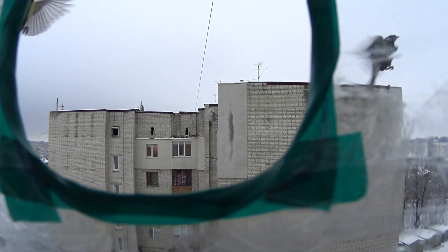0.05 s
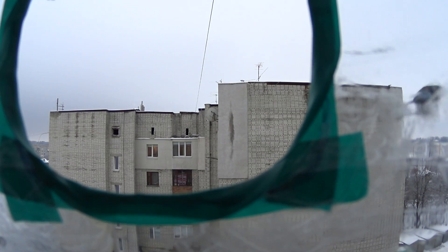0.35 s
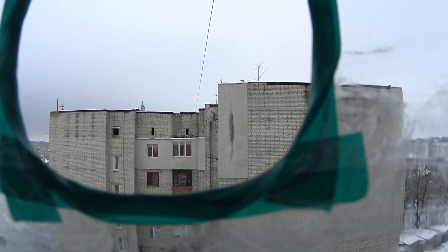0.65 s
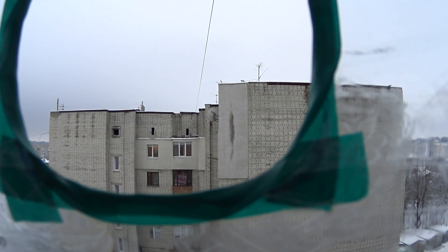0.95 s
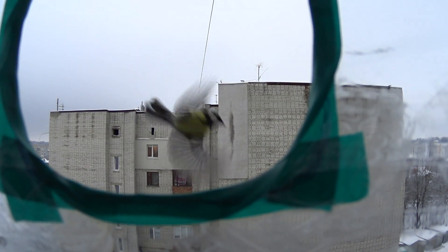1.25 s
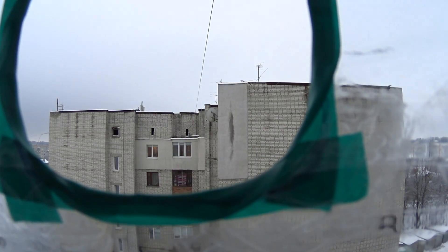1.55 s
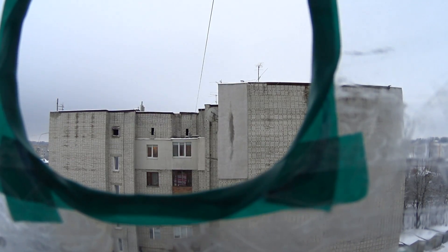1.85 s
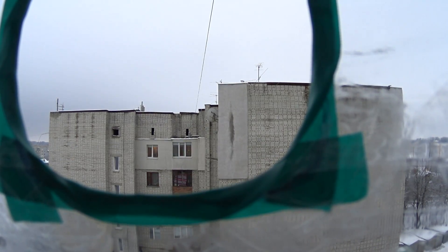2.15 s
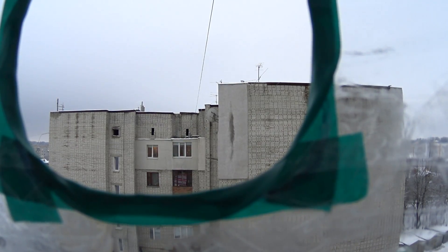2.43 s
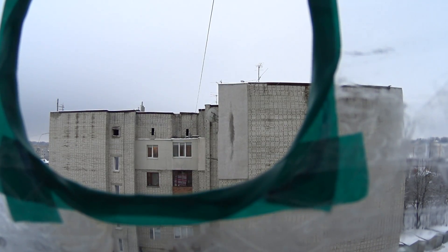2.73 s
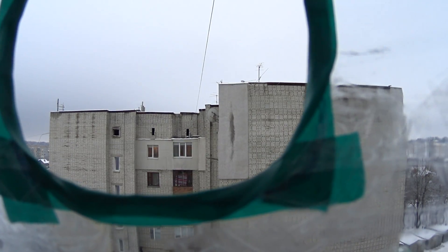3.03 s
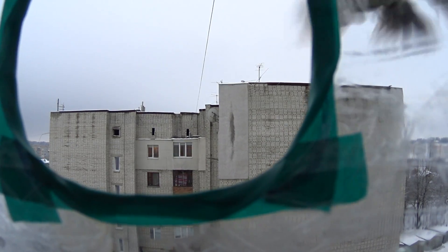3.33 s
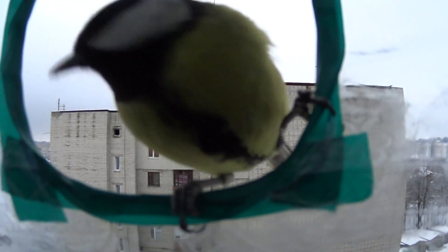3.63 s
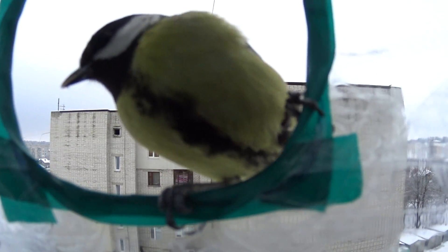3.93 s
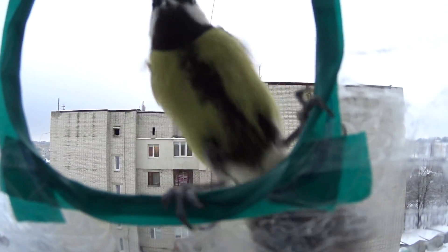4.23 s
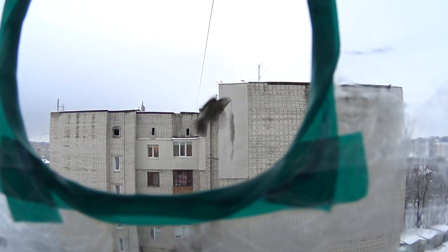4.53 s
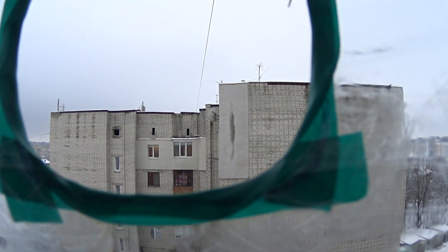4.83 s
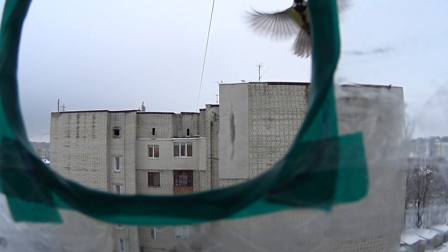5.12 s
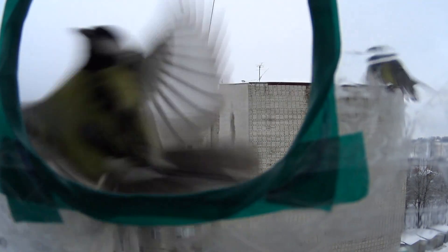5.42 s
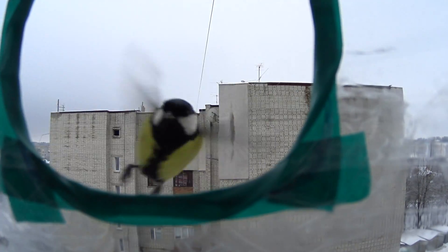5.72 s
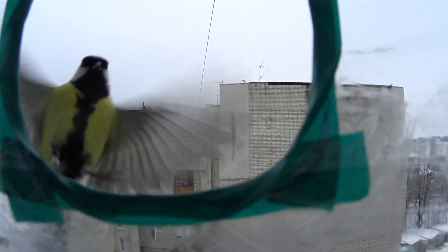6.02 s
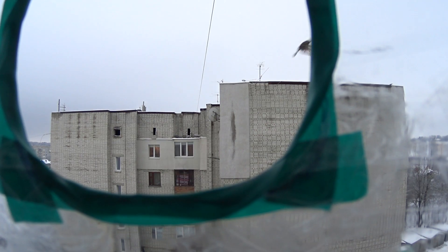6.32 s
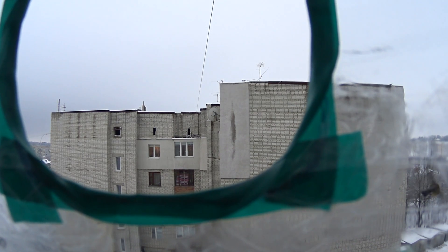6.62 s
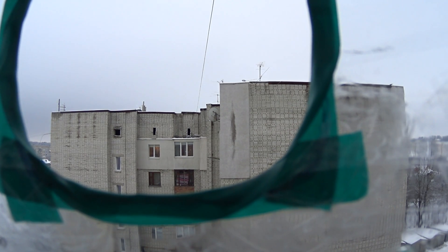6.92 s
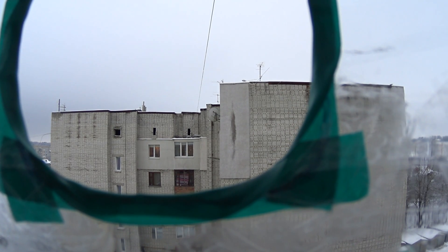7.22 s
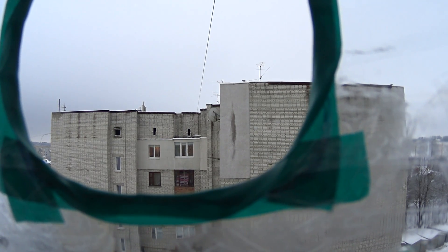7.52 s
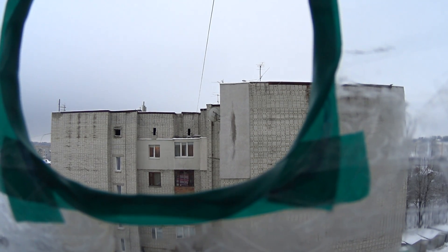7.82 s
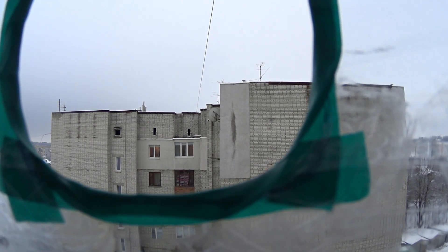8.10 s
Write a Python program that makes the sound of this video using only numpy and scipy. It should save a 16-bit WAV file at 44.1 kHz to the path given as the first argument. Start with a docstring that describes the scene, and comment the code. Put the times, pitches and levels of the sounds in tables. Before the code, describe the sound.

Small birds visit a plastic bottle feeder outside a high window, heard from inside the bottle. A few thin, high chirps and fluttering passes come first, then dull hollow knocks. A bird lands with sharp claw taps and scratching, then takes off, its wings buffeting the microphone. Another loud flutter brings more clicks and a skid before the wings fade. Distant traffic hums low throughout.

```python
"""Tits land on the taped rim of a plastic bottle feeder, heard from a microphone inside the bottle.
Their claws tap, skid and shuffle, ringing the thin shell; bumps on the mount knock in its hollow.
They call and flutter past, wings pumping the air, and one take-off blows straight into the microphone.
The feeder is outside a window, high above a winter town; far traffic hums in the valley below."""
import sys
import numpy as np
from scipy import signal
from scipy.fft import rfft, irfft, next_fast_len
from scipy.io import wavfile
from scipy.ndimage import uniform_filter1d

SR = 44100
rng = np.random.default_rng(int(sys.argv[2]) if len(sys.argv) > 2 else 0)


def digitize_waveform(pressure):
    """Quantize a signal to 16-bit integers and store it at the path in sys.argv[1].

    Rows of a 2-D input are taken as channels; values are limited to [-1, 1].
    """
    field = np.atleast_2d(pressure).T
    bounded = np.clip(field, -1, 1)
    quanta = np.round(bounded * 32767).astype(np.int16)
    wavfile.write(sys.argv[1], SR, quanta)


N = 368676
TIME = np.arange(N) / SR

# claw taps on the rim, right by the microphone; body and tick are relative to the middle band, the clack:
# (time [s], clack [dB], body [dB], tick [dB], pitch of the dent [Hz])
CLAW_TAPS = [(3.4535, -30, 16.5, -17, 2030), (3.5352, -42, 7.5, -24, 2000), (3.547, -43.5, 10, -12, 1696),
             (3.579, -40.5, 2, -21, 2230), (3.6848, -36.5, -10, -12.5, 3520), (3.707, -42.5, 9, -19, 1890),
             (3.713, -41.5, 1, -11, 1970), (3.78, -49, 7, -21, 1800), (3.7958, -42, 0.5, -37, 1710),
             (3.8753, -54, 16.5, -21, 1970), (3.9327, -45, 5, -10.5, 2570), (3.9653, -36.5, -13, -32, 2120),
             (3.983, -45, -5, -31, 2100), (3.998, -43, -9, -36, 2110), (4.02, -40, -3, -29, 1820),
             (4.1528, -37, -14, -13.5, 3520), (4.1694, -36, -9, -32, 1865), (4.218, -48, 0, -18, 2000),
             (4.2324, -36, -3, -19, 2100), (4.237, -35.5, -4, -30, 1800), (4.2459, -33, 5, -13, 1800),
             (4.3019, -27, 10.5, -7, 2320), (4.317, -37, -6, -7, 2800), (5.4802, -30, 3, -6, 2430),
             (5.8507, -18.5, -2, -12, 2380), (5.8555, -33, 2, -1, 3300), (5.87, -30, -14, -14.5, 3380),
             (5.8795, -22, -8, -0.5, 3660), (5.9216, -29.5, 7.5, -8.5, 2550), (6.244, -51, 14, -6, 2750),
             (6.584, -51.5, 9.5, -11.5, 2250), (6.92, -61.5, 17.5, -10, 2630)]


def claws(body_hz=1550, tick_hz=5500, contact_hz=8500, skid_s=.0012, skid_sharpness=1.15):
    """A claw hits, dents the wall and skids; a heavy grip rings the shell, a light step snaps drily."""
    size, lead, attack = 4096, 32, 296   # samples
    out, t = np.zeros((2, N)), TIME[:size - lead]
    hz = np.arange(size // 2 + 1) * SR / size
    # three overlapping bands that add up to the whole tap
    body = 1 / (1 + (hz / body_hz) ** 6)
    tick = 1 - 1 / (1 + (hz / tick_hz) ** 8)
    clack = 1 - body - tick
    contacts = [(*tap, 1) for tap in [*CLAW_TAPS, *rebounds(CLAW_TAPS), *shuffles()]]
    contacts += [(*slip, skid_sharpness) for slip in skids()]
    for s, db, body_db, tick_db, dent_hz, sharpness in contacts:
        weight = from_db((db + 30) / 4)
        force = from_db(-14) * weight * rng.standard_normal(len(t)) * np.exp(-t / (skid_s * weight))
        force[0] += 1   # the hit ahead of the crunch
        # a blunt toe presses longer than a claw tip, so it sounds duller
        top_hz = min(sharpness * contact_hz * from_db(tick_db / 3), 14000)
        force = butter(force, top_hz, "low", order=3)
        wall = weight * shell(force, spread=.5, crack=14 / weight ** 2)
        dent = 5.1 * ring(force, dent_hz, t60=.0032)
        tap = butter(wall + dent, 170, "high")
        spectrum = rfft(np.pad(tap, ((0, 0), (lead, 0))))
        for part, part_db in [(body, body_db - 2), (clack, 0), (tick, tick_db)]:
            band = irfft(spectrum * part)
            attack_rms = band.mean(axis=0)[:attack].std()
            add(out, s - lead / SR, band * from_db(db + part_db) / attack_rms)
    return out * from_db([[-.6], [.6]])   # slightly to the right


def rebounds(taps, above_db=-33, delay_s=.0055, loss_db=12.5, body_db=2):
    """A hard tap touches the rim again, more softly."""
    for s, db, _, tick_db, dent_hz in taps:
        if db > above_db:
            yield s + delay_s, db - loss_db, body_db, tick_db, dent_hz


# restless feet on the rim: (start [s], end [s], clack [dB])
FOOT_SHUFFLES = [(3.515, 3.58, -43), (3.693, 3.72, -44), (3.89, 3.92, -56.5), (4.153, 4.2, -51),
                 (5.913, 5.985, -49)]


def shuffles(step_s=.015, scatter_db=5, body_db=2, tick_db=-25.5, dent_hz=1990):
    """Light, uneven steps run together into a faint scratching."""
    for start, end, db in FOOT_SHUFFLES:
        for s in np.arange(start, end, step_s):
            jitter_s = step_s * (rng.random() - .5)
            yield s + jitter_s, db + scatter_db * rng.standard_normal(), body_db, tick_db, dent_hz


# a foot skidding over the rim, with its levels at mid-run:
# (start [s], slips [count], clack [dB], relative body [dB], relative tick [dB], pitch of the dent [Hz])
FOOT_SKIDS = [(3.4522, 6, -24.5, 4.5, -6.5, 2030), (6.029, 4, -18, -3.5, -20, 2850)]


def skids(slip_s=.0106, ends_db=-2.5, catch_s=.005, catch_db=-10.5):
    """Stick and slip: the run swells and fades, brightening as the load moves from toe to claw tip."""
    for start, slips, db, body_db, tick_db, dent_hz in FOOT_SKIDS:
        middle = (round(slips) - 1) / 2
        for k in range(round(slips)):
            s, past_middle = start + k * slip_s, k - middle
            slip_db = db + ends_db * (past_middle / middle) ** 2
            tone = body_db - 1.5 * past_middle, tick_db + 2.2 * past_middle, dent_hz
            yield s, slip_db, *tone
            # a rough skid catches once more within each slip
            yield s + catch_s * (.5 + rng.random()), slip_db + catch_db, *tone


# modes of the plastic wall around the microphone: (frequency [Hz], level [dB], time to fall 60 dB [s])
SHELL_MODES = [(414, 0, 0.031), (576, 3, 0.014), (1054, 8.5, 0.028), (1142, 1, 0.032), (1376, 2.5, 0.022),
               (1567, -8.5, 0.02), (1795, 2.5, 0.0096), (2360, -7.5, 0.005), (2693, 0, 0.009),
               (2885, -5, 0.027), (3550, -1, .022), (4220, 0.5, 0.01), (4940, -4.5, 0.0069),
               (5595, -2.5, 0.0087), (8280, -12, .004), (9900, -1.5, .004)]


def shell(force, spread, crack, wander=.072, floppy_hz=7000, scatter_db=1.5):
    """The place of contact picks each mode's strength and sign; the crowded high modes vary in pitch."""
    out = crack * stereo(force, .15 * np.roll(force, 1))
    for hz, db, t60 in SHELL_MODES:
        pitch = hz * np.exp(wander * min(hz / floppy_hz, 1) ** 2 * rng.standard_normal())
        strength = from_db(db + scatter_db * rng.standard_normal()) * rng.choice([-1, 1])
        mode = strength * ring(force, pitch, t60)
        pan = spread * min(1500 / hz, 1) * rng.choice([-1, 1])
        out = out + stereo(mode, pan * mode)
    return out


# feathers and claws dragging on the outside of the bottle: (start [s], end [s], level [dB])
DRAGS = [(3.453, 3.501, -26), (3.513, 3.601, -44), (4.243, 4.307, -33), (5.425, 5.436, -40),
         (5.93, 5.953, -34.5), (6.02, 6.067, -23.5)]
# their rub, heard from inside: (frequency [Hz], level [dB])
RUB_SPECTRUM = [(120, -5.5), (350, 6.5), (600, 5), (780, -9.5), (1050, 5.5), (1700, -2), (2800, -5.5),
                (4000, -12), (5700, -16), (7000, -19), (10000, -25), (15000, -37.5)]


def scrapes(slips_per_s=2000):
    """Dense little slips along the plastic merge into a rub."""
    slips = (rng.random(N) < slips_per_s / SR) * rng.standard_normal((2, N))
    pressure = sum(from_db(db) * ((TIME > start) & (TIME < end)) for start, end, db in DRAGS)
    mid, side = rms_one(colour(slips, RUB_SPECTRUM))
    return stereo(mid, .26 * side) * uniform_filter1d(pressure, SR // 300)


# dull knocks that reach the microphone through the mount: (time [s], level [dB])
MOUNT_BUMPS = [(0.162, -26), (.949, -25.5), (2.968, -28.5), (3.022, -27.5), (3.04, -26.5), (3.054, -25.5),
               (3.064, -19.5), (3.0704, -15), (3.089, -24.5), (7.016, -29.5), (7.046, -32), (7.082, -30.5)]


def knocks(hollow_hz=570, hollow_t60=.028, wall_hz=3550):
    """Soft bumps ring the hollow of the feeder; the harder ones rattle its wall."""
    out, t = np.zeros((2, N)), TIME[:SR // 6]
    for s, db in MOUNT_BUMPS:
        force = butter(rng.standard_normal(len(t)) * np.exp(-t / .003), 7200, "low")
        wall = shell(force, spread=.3, crack=6.5) + 2 * ring(force, wall_hz, t60=.015)
        pitch = hollow_hz * from_db((db + 29.5) / 20)   # a harder bump rings higher
        hollow = np.sin(2 * np.pi * pitch * t) * from_db(-60 * t / hollow_t60)
        rattle = from_db(-11 + (db + 21.5) / 2) * wall / abs(wall).max()
        add(out, s, from_db(db - 1) * (hollow + rattle))
    return out


# flights close to the microphone, with their levels at the nearest point: (first beat [s], beats [count],
# beat period [s], nearest at [s], passing time [s], pressure [dB], eddies [dB], feather flick [dB])
CLOSE_FLIGHTS = [(0.481, 3, 0.046, .51, .13, -37, -36.5, -66),
                 (1.17, 7, .0415, 1.24, 0.041, -36, -35.5, -46.5),
                 (3.283, 4, 0.047, 3.425, 0.045, -19.5, -31, -57),
                 (4.323, 9, .0468, 4.32, 0.04, -12.5, -28.5, -42.5),
                 (5.442, 7, .0397, 5.47, 0.055, -9, -22.5, -44), (5.8, 2, 0.052, 5.82, .1, -26, -35, -57),
                 (6.083, 4, 0.051, 6.12, 0.081, -21.5, -35, -65)]
# swirling air shed by a wing: (frequency [Hz], level [dB])
EDDY_SPECTRUM = [(30, -19.5), (90, 2), (250, 0), (480, -1.5), (750, -23), (1080, -19), (2000, -31.5),
                 (8000, -51.5)]


def wings(feathers, stroke_s=.0032, eddy_s=.0093, flick_s=.0018, lead_s=.05):
    """Each downstroke is a suction then a push; it sheds a puff of eddies and the feathers flick."""
    push, puff, flick = np.zeros((3, N))
    t = TIME[:SR // 8] - lead_s
    stroke = t / stroke_s * np.exp((1 - (t / stroke_s) ** 2) / 2)
    for first, beats, period, nearest, passing, push_db, eddy_db, flick_db in CLOSE_FLIGHTS:
        for s in first + period * np.arange(round(beats)):
            far = distance(s, nearest, passing)   # each part dies away as its own power of this
            add(push, s - lead_s, from_db(push_db - 2) / far ** 1.76 * stroke)
            add(puff, s - lead_s, from_db(eddy_db + 1) / far ** 1.2 / np.cosh((t - .002) / eddy_s))
            add(flick, s - lead_s, from_db(flick_db + 1) / far ** .69 / np.cosh((t - .001) / flick_s))
    return push + puff * air_noise(EDDY_SPECTRUM) + flick * feathers


# the gust of one take-off, straight into the microphone: (time [s], level [dB])
GUST_LEVEL = [(4.365, -80), (4.378, -11), (4.398, -9.5), (4.407, -9.5), (4.416, -19.5), (4.431, -5),
              (4.442, -52), (4.47, -32), (4.52, -54)]
# its buffeting on the ports: (frequency [Hz], level [dB])
BUFFET_SPECTRUM = [(20, -26.5), (55, -14.5), (100, 10), (200, -5), (350, 4), (600, -10), (1100, -26),
                   (2500, -58.5), (8000, -76.5)]


def downwash():
    """The gust crosses the microphone and pushes its two ports mostly in opposition."""
    mid, side = rms_one(colour(rng.standard_normal((2, N)), BUFFET_SPECTRUM))
    return from_db(in_time(GUST_LEVEL)[0] - 1) * stereo(.39 * mid, side)


# birds fluttering past the feeder: (nearest at [s], level [dB], approach [s], retreat [s])
FLY_BYS = [(0, -55, .1, .2), (.5, -55.5, 0.29, .15), (.9, -58, 0.21, .2), (1.219, -51, 0.12, .11),
           (1.6, -60, 0.21, .3), (3.08, -60.5, .06, .2), (3.45, -53.5, .15, .28), (4.31, -38, 0.025, .03),
           (4.58, -60, .15, .25), (5.181, -58.5, .05, .08), (5.49, -46, 0.09, .07), (6.0, -49, 0.22, .15),
           (6.6, -63.5, 0.54, .8), (8.03, -60.5, .04, .12)]


def flutter_level():
    """Rustle of all the passing birds in dB; each one falls with the square of its distance."""
    t, power = TIME[::64], 0
    for s, db, approach, retreat in FLY_BYS:
        far = distance(t, s, np.where(t < s, approach, retreat))
        power = power + (from_db(db) / far ** 2) ** 2
    return np.interp(TIME, t, 10 * np.log10(power))


def rustle(feathers, flutter_db, beat_hz=22, throb_db=3, grain_db=2):
    """The feather noise of birds in the air nearby throbs unevenly with the wing beat."""
    rate = beat_hz * (1 + .142 * drift(4.54))
    throb = np.sin(2 * np.pi * np.cumsum(rate) / SR)
    return from_db(flutter_db - 1 + throb_db * throb + grain_db * drift(120)) * feathers


# rustling feathers, heard from inside the bottle: (frequency [Hz], level [dB])
FEATHER_SPECTRUM = [(300, -36.5), (1100, 9.5), (1600, 7.5), (2200, -5), (2800, 3.5), (3150, -5.5),
                    (3500, 1.5), (4100, -5), (4700, -4.5), (5100, -8.5), (5700, -6), (7000, -13),
                    (10000, -14.5), (16000, -23.5)]


def feather_noise():
    """The hiss of feathers sliding over each other."""
    return air_noise(FEATHER_SPECTRUM)


# tits calling around the feeder: (start [s], length [s], first pitch [Hz], plateau [Hz],
# bend of the fall [1 = even], final droop [octaves], level [dB], step per overtone [dB], rasp [0-1])
WHISTLES = [(0, 0.032, 6700, 6420, 1.8, 0.025, -40, -24, 0.0054),
            (.958, .06, 4750, 4700, 1.2, 0.093, -67, -25, .02),
            (1.579, 0.024, 7060, 4080, 5.9, 0, -41, -11.5, 0.034),
            (1.735, 0.07, 5600, 5100, 1.05, 0.074, -44.5, -15.5, .008),
            (1.79, .039, 5420, 1590, 2.9, .6, -49.5, -7, 0.42),
            (2.075, 0.039, 8020, 3650, 5, 0.41, -41.5, -11, 0.089)]


def calls(waver=.0048, attack_s=.0017, release_s=.0083, sag_db=-3):
    """Short whistles with two weak overtones drop fast, level off and may droop; the lowest one rasps."""
    out = np.zeros(N)
    for s, length, first_hz, plateau_hz, bend, droop, db, overtone_db, rasp in WHISTLES:
        t = TIME[TIME < length]
        progress = t / length
        hz = plateau_hz * (first_hz / plateau_hz) ** ((1 - progress) ** bend)
        hz /= 2 ** (droop * progress ** 4.3)
        hz *= 1 + (waver + rasp * progress) * drift(1090, size=len(t))
        phase = 2 * np.pi * np.cumsum(hz) / SR
        envelope = np.minimum(t / attack_s, 1) * np.minimum((length - t) / release_s, 1)
        tone = sum(from_db((k - 1) * overtone_db) * np.sin(k * phase) * (k * hz < SR / 2)
                   for k in (1, 2, 3))
        add(out, s, from_db(db + sag_db * progress) * envelope * tone)
    return np.sqrt(2) * out


# low rumble at the window: (frequency [Hz], level [dB])
RUMBLE_SPECTRUM = [(12, -49), (28, -2), (68, -0.5), (100, -4.5), (150, -1), (190, -4.5), (227, -4.5),
                   (290, -10.5), (420, -63.5), (900, -50)]


def rumble(flutter_db, town_db=-50):
    """The town's steady rumble, which grows as birds stir the air near the microphone."""
    stirred_air = from_db(-8.5 + .65 * flutter_db)
    return np.hypot(from_db(town_db), stirred_air) * air_noise(RUMBLE_SPECTRUM)


# traffic far below the window: (time [s], level [dB])
HUM_LEVEL = [(0.0, -45.5), (0.32, -47.5), (0.7, -45), (2.7, -49), (3.51, -45.5), (4.84, -45.5), (6.08, -48),
             (6.63, -45.5), (8.36, -45.5)]
# its hum inside the bottle: (frequency [Hz], level [dB])
HUM_SPECTRUM = [(100, -27.5), (260, -5.5), (380, 0), (450, 2.5), (560, -4), (760, -17), (910, -20),
                (1080, -5.5), (1230, -16), (1450, -15), (1900, -26), (2350, -30), (2720, -27.5),
                (3100, -37), (3470, -28.5), (3900, -37), (6000, -43), (15000, -61.5)]


def traffic(swell_db=.85):
    """Far traffic swells and sinks, coloured by the bottle's air modes."""
    hum_db = in_time(HUM_LEVEL)[0] + .5 + swell_db * drift(5)
    return from_db(hum_db) * air_noise(HUM_SPECTRUM)


# one engine far down in the town: (time [s], firing rate [Hz], level [dB])
FAR_ENGINE = [(0, 72.3, -53), (.55, 66.3, -50), (.9, 70.5, -60), (1.2, 70.2, -52), (1.7, 69.8, -51),
              (1.9, 71.06, -68), (8.36, 69.6, -60)]
# a higher drone in the far traffic: (time [s], pitch [Hz], level [dB])
FAR_DRONE = [(0, 225, -44), (.6, 227.5, -61), (.9, 223.6, -54.5), (1.5, 232.5, -57), (2.0, 231, -61.5),
             (2.45, 226.8, -52), (2.8, 225.8, -65), (8.36, 224.9, -60.5)]


def far_motor(curve, wobble=.015, fade_db=2):
    """A low motor tone that wavers and fades on its way across town."""
    hz, db = in_time(curve)
    speed, fade = rms_one(butter(rng.standard_normal((2, N)), 4.26, "low"))
    phase = 2 * np.pi * np.cumsum(hz * (1 + wobble * speed)) / SR
    return np.sqrt(2) * from_db(db + fade_db * fade) * np.sin(phase)


def microphone_hiss(level_db=-73):
    """The microphone's own faint white noise."""
    mid, side = rng.standard_normal((2, N))
    return from_db(level_db) * stereo(mid, .25 * side)


# stereo width at the microphone: (frequency [Hz], side relative to mid [dB])
STEREO_WIDTH = [(60, -52), (110, -42), (200, -14.5), (380, -24.5), (700, -4), (1290, -5.5), (2380, -4),
                (4400, -8), (8120, -6.5), (15000, -15.5)]


def air_noise(spectrum):
    """Coloured noise, alike in both channels in the bass and wider above."""
    mid, side = colour(rng.standard_normal((2, N)), spectrum)
    return stereo(rms_one(mid), colour(rms_one(side), STEREO_WIDTH))


def colour(x, spectrum):
    """Filter by a (frequency [Hz], level [dB]) table."""
    hz, db = np.transpose(spectrum)
    size = next_fast_len(N)
    bins = np.arange(size // 2 + 1) * SR / size
    gain = from_db(np.interp(np.log(bins + 1), np.log(hz), db))
    return irfft(rfft(x, size) * gain, size)[..., :N]


def ring(force, hz, t60):
    """A unit click sets a sine of height 1 ringing."""
    r, w = from_db(-60 / (t60 * SR)), 2 * np.pi * hz / SR
    return signal.lfilter([0, np.sin(w)], [1, -2 * r * np.cos(w), r * r], force + 1e-18)


def distance(s, nearest_s, passing_s):
    """Distance of a bird on a straight path, relative to its nearest."""
    return np.hypot(1, (s - nearest_s) / passing_s)


def drift(hz, size=N):
    """Random wander of rms 1, mostly slower than hz."""
    return rms_one(butter(rng.standard_normal(size), hz, "low"))


def in_time(rows):
    """Each column of a curve at every sample."""
    s, *columns = np.transpose(rows)
    return [np.interp(TIME, s, column) for column in columns]


def add(track, s, sound):
    """Mix a sound into a track at a time."""
    i = max(round(s * SR), 0)
    track[..., i:i + sound.shape[-1]] += sound[..., :N - i]


def butter(x, hz, kind, order=2):
    return signal.sosfilt(signal.butter(order, hz, kind, fs=SR, output="sos"), x)


def stereo(mid, side):
    return np.array([mid + side, mid - side])


def from_db(db):
    return 10 ** (np.asarray(db) / 20)


def rms_one(x):
    return x / np.sqrt(np.mean(x ** 2) + 1e-20)


def scene():
    """Birds at the feeder, close up, over the far town."""
    feathers, flutter_db = feather_noise(), flutter_level()
    background = rumble(flutter_db) + traffic() + microphone_hiss()
    motors = far_motor(FAR_ENGINE) + far_motor(FAR_DRONE)
    flight = wings(feathers) + rustle(feathers, flutter_db) + downwash()
    return background + motors + flight + calls() + scrapes() + knocks() + claws()


def record(dry, ceiling=.9, cutoff_hz=15900):
    """Peaks are rounded and the highest treble is cut."""
    rounded = ceiling * np.tanh(dry / ceiling)
    return signal.sosfilt(signal.ellip(10, .1, 80, cutoff_hz, fs=SR, output="sos"), rounded)


dry = scene()
out = record(dry)
digitize_waveform(out)
```